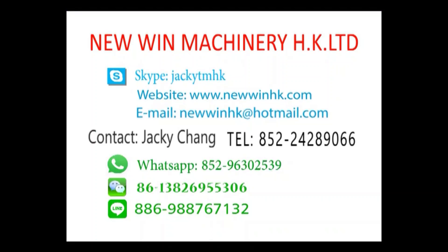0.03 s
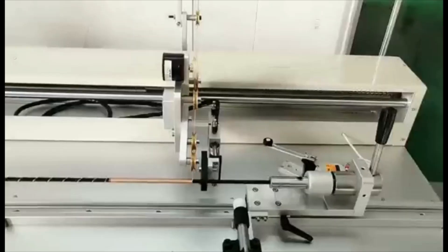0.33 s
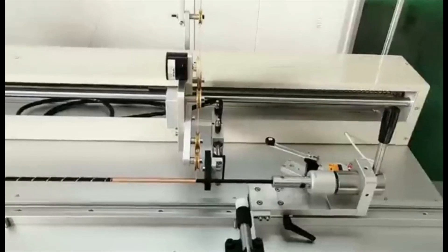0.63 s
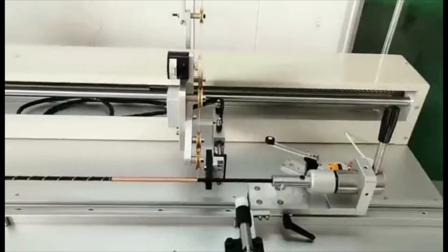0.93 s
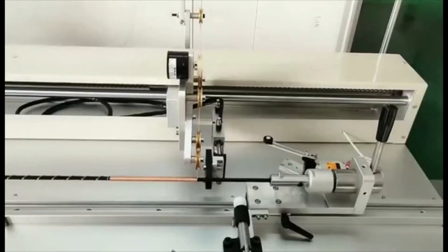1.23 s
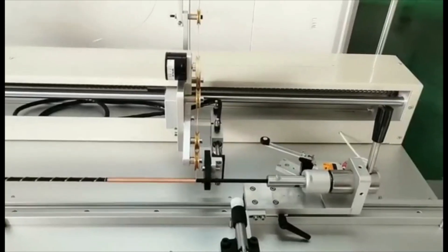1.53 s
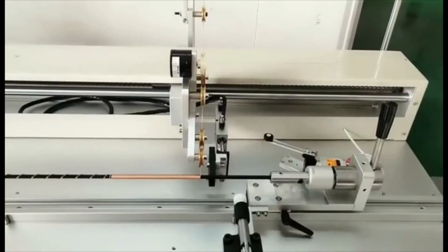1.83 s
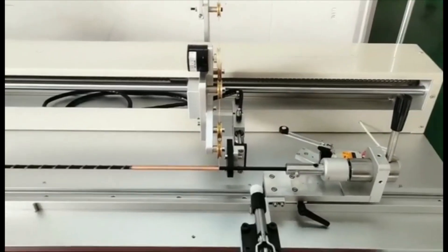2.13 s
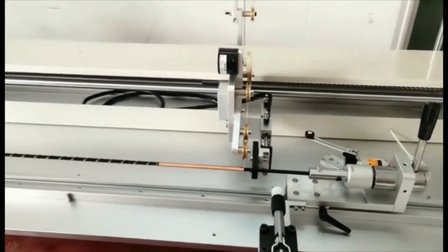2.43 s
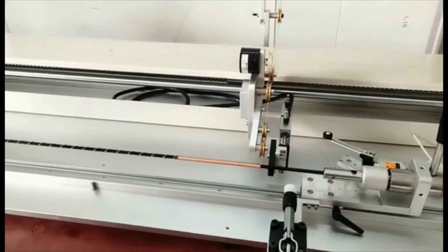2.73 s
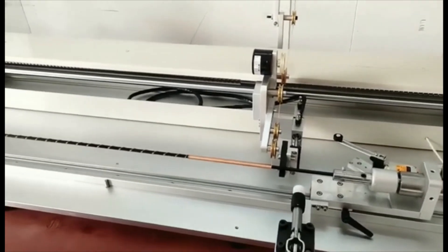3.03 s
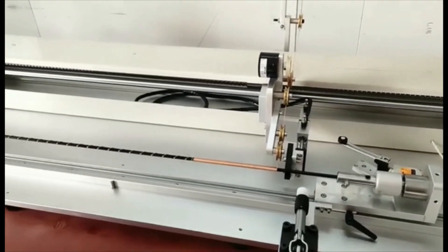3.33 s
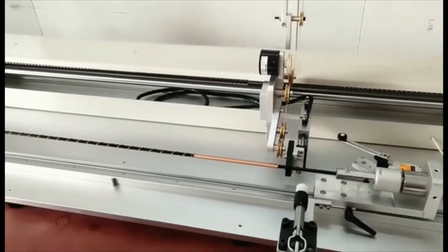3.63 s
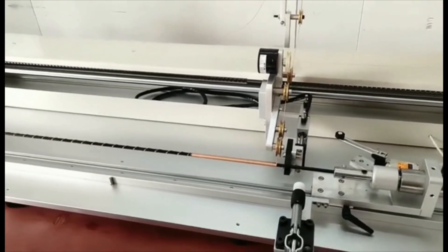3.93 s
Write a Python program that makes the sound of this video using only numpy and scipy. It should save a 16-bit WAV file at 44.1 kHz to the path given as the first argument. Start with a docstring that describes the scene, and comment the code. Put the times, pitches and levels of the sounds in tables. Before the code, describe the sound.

A coil winding machine runs steadily on a workshop bench, close by, with a dense hum, throbbing whine and hiss. A metallic knock rings early, followed by a brief scrape, three soft wire rubs and another scrape.

```python
"""A coil winding machine on a workshop bench, running steadily, close to a mono microphone.
It fades in at 0.3 s: under an even hiss the spindle hums on multiples of its turning rate over a dense
rumble, while the motor whine throbs and the wire guide chatters twice a turn. At 0.8 s a metallic knock
rings out and the guide scrapes. The wire then rubs on the coil three times, and at 3.4 s the guide
scrapes again. Now and then the treble dips for an instant."""
import sys
import numpy as np
from scipy import signal
from scipy.fft import rfft, irfft
from scipy.io import wavfile

SR = 44100
rng = np.random.default_rng(int(sys.argv[2]) if len(sys.argv) > 2 else 0)


def store_wav(level_fs):
    """Save 16-bit WAV to argv[1]."""
    pcm = np.round(np.clip(np.atleast_2d(level_fs), -1, 1) * 32767)
    wavfile.write(sys.argv[1], SR, pcm.T.astype(np.int16))


N = 176400
TIME = np.arange(N) / SR
SPINDLE_HZ, THROB_HZ = 9.255, 18.36   # about two throbs to a turn


def from_db(db):
    """Decibels to gain."""
    return 10 ** (np.asarray(db) / 20)


def rms_one(x):
    """Scale to rms 1."""
    return x / np.sqrt(np.mean(x ** 2) + 1e-20)


def fader(rows):
    """A curve of (t/s, level/dB) points as a gain for every sample."""
    return from_db(np.interp(TIME, *np.transpose(rows)))


def drift(rate_hz):
    """A smooth random wander of about rms 1."""
    step, settle = 40, 2000
    pole = np.exp(-2 * np.pi * rate_hz * step / SR)
    noise = rng.standard_normal(N // step + settle + 2)
    slow = signal.lfilter([1], [1, -2 * pole, pole * pole], noise)[settle:]
    return np.interp(np.arange(N) / step, np.arange(len(slow)), rms_one(slow))


def resonant_noise(hz, width_hz):
    """Noise in one steep-sided band; rms 1."""
    edges = [max(hz - width_hz / 2, 10), hz + width_hz / 2]
    band = signal.butter(2, edges, "band", fs=SR, output="sos")
    return rms_one(signal.sosfilt(band, rng.standard_normal(N)))


def coloured_noise(spectrum, flicker_db, flicker_hz):
    """Noise with the given spectral shape, each octave flickering on its own; rms 1."""
    hz = np.maximum(np.arange(N // 2 + 1) * SR / N, 1)
    points, db = np.transpose(spectrum)
    skirts = np.minimum(1, hz / points[0]) ** 2 * np.minimum(1, points[-1] / hz) ** 2
    shaped = rfft(rng.standard_normal(N)) * from_db(np.interp(np.log(hz), np.log(points), db)) * skirts
    octave = np.clip(np.floor(np.log2(hz / 20)), 0, 8)
    bands = (irfft(shaped * (octave == k), N) for k in range(9))
    return rms_one(sum(band * from_db(flicker_db * drift(flicker_hz)) for band in bands))


def tone(hz, waver_db, jitter_rad, rate_hz):
    """A sine that wavers in level and phase; rms 1."""
    gain = from_db(waver_db * drift(rate_hz))
    phase = 2 * np.pi * (hz * TIME + rng.random()) + jitter_rad * drift(rate_hz)
    return rms_one(gain * np.sin(phase))


def ring(clicks, hz, t60):
    """A unit click sets off a decaying sine of height 1."""
    pole, angle = 10 ** (-3 / (t60 * SR)), 2 * np.pi * hz / SR
    return signal.lfilter([0, np.sin(angle)], [1, -2 * pole * np.cos(angle), pole * pole], clicks + 1e-18)


def hiss():
    """An even hiss that fades in with the machine."""
    # spectrum of the hiss: f/Hz, relative density/dB
    spectrum = [(700, -32.5), (1500, -10), (2300, -11.5), (3500, -9), (5200, -9), (6200, -5), (7000, 2),
                (7600, -1.5)]
    # fade-in and slight swells of the hiss: t/s, level/dB
    fade = [(.28, -56), (.31, -14), (.46, -4), (.76, -0.5), (.95, 3), (1.4, -0.5), (1.7, .5), (2.3, -0.14),
            (3.2, 0.4), (3.42, 2.3), (4, 0)]
    return from_db(-43.5) * fader(fade) * coloured_noise(spectrum, flicker_db=0.74, flicker_hz=25)


def frame_rumble():
    """The running drive stirs the frame: narrow resonances over a dense rumble."""
    # frame resonances: f/Hz, width/Hz, level/dB
    resonances = [(135.3, 20, -53), (306.7, 41, -62), (365.5, 44, -55), (437, 13, -63.5), (538, 68, -52.5),
                  (683, 49, -54.5), (891, 8.3, -73), (984.5, 25, -68.5)]
    # rise and fall of these resonances: t/s, level/dB
    swell = [(.4, -0.5), (1.3, -0.5), (1.58, 6), (1.8, 2.5), (2.3, -1), (2.9, 1), (4, -2.5)]
    # spectrum of the rumble: f/Hz, relative density/dB
    spectrum = [(20, -15), (45, -5.5), (62, -5), (100, 1), (150, -5), (200, -5.5), (260, -5.5), (360, -7.5),
                (470, -11.5), (610, -14.5), (800, -16), (1150, -17.5), (1600, -29.5)]
    frame = fader(swell) * sum(from_db(db) * resonant_noise(hz, width) for hz, width, db in resonances)
    return frame + from_db(-43) * coloured_noise(spectrum, flicker_db=1.87, flicker_hz=9.7)


def wire_rubs():
    """Soft swells of friction as the wire settles on the coil."""
    # rubs of the wire: peak t/s, half length/s, level/dB, centre f/Hz
    rubs = [(1.576, .1, -49.5, 750), (2.323, 0.07, -56.5, 1000), (2.897, 0.055, -52, 900)]
    return sum(from_db(db) * np.exp(-((TIME - t) / half) ** 2) * resonant_noise(hz, width_hz=330)
               for t, half, db, hz in rubs)


def guide_scrapes():
    """The guide scrapes briefly: rough friction that swells quickly and dies away."""
    # strokes of the guide: peak t/s, level/dB, time to rise 20 dB/s, t60/s
    strokes = [(0.949, -50, 0.12, 0.64), (3.39, -48, 0.025, 0.82)]
    # resonances of the scrape: f/Hz, width/Hz, relative level/dB
    resonances = [(1353, 120, -7), (1818, 100, -4), (2220, 140, -10.5), (2670, 350, -8), (3110, 370, -10.5),
                  (4570, 1100, -5)]
    envelope = sum(from_db(db - np.maximum(20 * (t - TIME) / rise, 60 * (TIME - t) / t60))
                   for t, db, rise, t60 in strokes)
    body = sum(from_db(db) * resonant_noise(hz, width) for hz, width, db in resonances)
    return envelope * body * from_db(2.0 * drift(rate_hz=90))


def knock():
    """A metal part strikes and bounces: a crack, ringing modes and a thud in the bench."""
    # the strike and its bounces: t/s, level/dB
    strikes = [(.8248, -40), (.8288, -41), (.8345, -40)]
    # modes of the metal part: f/Hz, relative level/dB, t60/s
    modes = [(1290, -2, 0.19), (1328, -3.5, 0.19), (2150, -7, 0.14), (2524, -6, 0.27), (3600, -2, 0.14),
             (4630, -17, .025)]
    crack_t60_s = 0.032
    clicks, crack_envelope = np.zeros(N), np.zeros(N)
    for t, db in strikes:
        clicks[int(t * SR)] = from_db(db)
        crack_envelope += (TIME >= t) * from_db(db - 60 * np.maximum(TIME - t, 0) / crack_t60_s)
    metal = sum(from_db(db) * ring(clicks, hz, t60) for hz, db, t60 in modes)
    thud = from_db(7.5) * ring(clicks, hz=162, t60=.12)
    crack = from_db(3) * crack_envelope * resonant_noise(hz=4300, width_hz=8200)
    return metal + thud + crack


def guide_chatter():
    """The wire guide buzzes in short bursts, twice a turn, each of its own strength, slowly growing."""
    # resonances of the wire guide: f/Hz, width/Hz, level/dB
    resonances = [(1331.5, 50, -59.5), (1466, 29, -64.5), (1640, 35, -71), (1823, 23, -76.5),
                  (2202, 48, -79.5)]
    first_s, half_length_s, jitter_s = 0.056, 0.026, 0.0034
    floor_db, spread_db, growth_db_per_s = -13.5, 5, 1.5
    beats = first_s + np.arange(int(TIME[-1] * THROB_HZ) + 1) / THROB_HZ
    bursts = from_db(floor_db)
    for t in beats:
        late, strength = rng.uniform(-1, 1, 2)
        from_peak = np.minimum(abs(TIME - t - late * jitter_s) / half_length_s, 1)
        bursts = bursts + from_db(spread_db * strength) * (1 - from_peak ** 2) ** 2
    buzz = sum(from_db(db) * resonant_noise(hz, width) for hz, width, db in resonances)
    return rms_one(bursts * from_db(growth_db_per_s * TIME)) * buzz


def motor_whine():
    """The motor's tone and its side tones beat twice a turn, under a thin steady upper tone."""
    # partials of the whine: offset from the main tone/turning rates, relative level/dB
    partials = [(-3, -15), (-1, -12), (0, 0), (1, -15), (2, -7)]
    whine_hz, whine_db, first_peak_s = 550.3, -46.5, .042
    turn_angle = np.pi * THROB_HZ * (TIME - first_peak_s)
    phase = 2 * np.pi * (whine_hz * TIME + rng.random()) + 0.17 * drift(rate_hz=5)
    throb = np.sqrt(2) * sum(from_db(db) * np.sin(phase + k * turn_angle) for k, db in partials)
    upper = from_db(-55.5) * tone(hz=647.6, waver_db=2.0, jitter_rad=.12, rate_hz=5.6)
    return from_db(whine_db + .9 * drift(rate_hz=6.2)) * throb + upper


def spindle_hum():
    """The spindle hums on multiples of its turning rate, and the drive adds tones of its own."""
    # spindle harmonics: multiple of the turning rate, level/dB
    harmonics = [(14, -48.5), (15, -52), (16, -50), (17, -69), (18, -48), (20, -58.5), (22, -56), (30, -60)]
    # steady tones of the drive: f/Hz, level/dB
    drive_tones = [(48.7, -62.5), (75.6, -59), (86.6, -59.5), (131.6, -55), (172.9, -54), (801.3, -69.5),
                   (984.1, -77), (1834, -76), (2207.6, -74)]
    spindle = sum(from_db(db) * tone(k * SPINDLE_HZ, waver_db=3, jitter_rad=0.39, rate_hz=1.7)
                  for k, db in harmonics)
    drive = sum(from_db(db) * tone(hz, waver_db=3.5, jitter_rad=0.28, rate_hz=8) for hz, db in drive_tones)
    return spindle + drive


def treble_dips(x):
    """The band from 1100 to 6100 Hz sinks for an instant at each dip."""
    # dips in the treble: t/s, depth/dB
    dips = [(.613, 14), (.85, 12), (1.19, 11), (1.338, 12), (1.935, 10), (2.573, 15), (3.045, 11),
            (3.129, 15), (3.705, 12), (3.983, 12)]
    half_length_s = .008
    depth_db = sum(db * np.exp(-((TIME - t) / half_length_s) ** 4) for t, db in dips)
    treble = signal.sosfiltfilt(signal.butter(8, [1100, 6100], "band", fs=SR, output="sos"), x)
    return x - treble * (1 - from_db(-depth_db))


def scene():
    """The running machine and the knock from close up, the same on both channels."""
    # fade-in of the hum and rumble: t/s, level/dB
    low_fade = [(.27, -69), (.31, -15.5), (.355, -12), (.42, -9.5), (.465, -2), (.75, 0), (.95, 1.5),
                (1.6, -0.6), (2.4, 0.5), (2.9, 0.5), (4, 1.2)]
    # fade-in of the whine and chatter: t/s, level/dB
    mid_fade = [(.27, -69), (.31, -12), (.36, -10), (.42, -11), (.47, -3.5), (.75, -0.5), (.95, 0),
                (2.4, 0.15), (4, 1)]
    lows = fader(low_fade) * (spindle_hum() + frame_rumble())
    mids = fader(mid_fade) * (motor_whine() + guide_chatter())
    mono = treble_dips(lows + mids + hiss() + wire_rubs() + guide_scrapes()) + knock()
    return np.stack([mono, mono])


def record(dry):
    """The top is cut steeply above 7500 Hz."""
    return signal.sosfilt(signal.ellip(14, .2, 80, 7500, fs=SR, output="sos"), dry)


dry = scene()
out = record(dry)
store_wav(out)
```